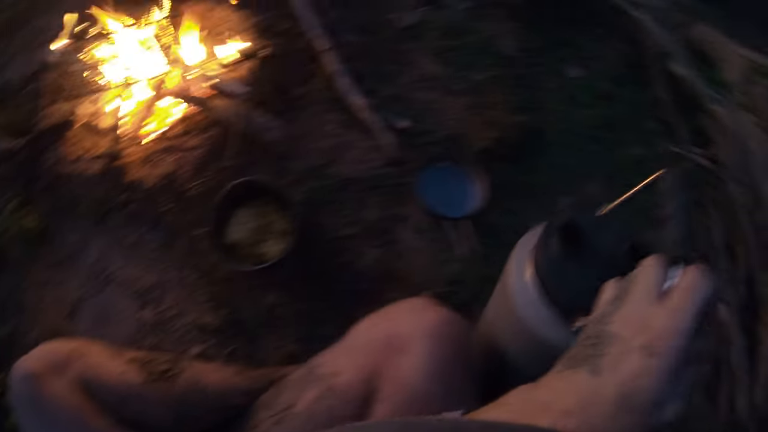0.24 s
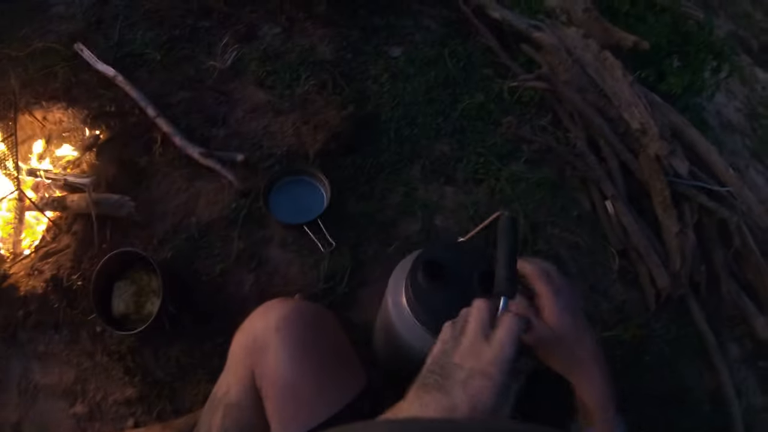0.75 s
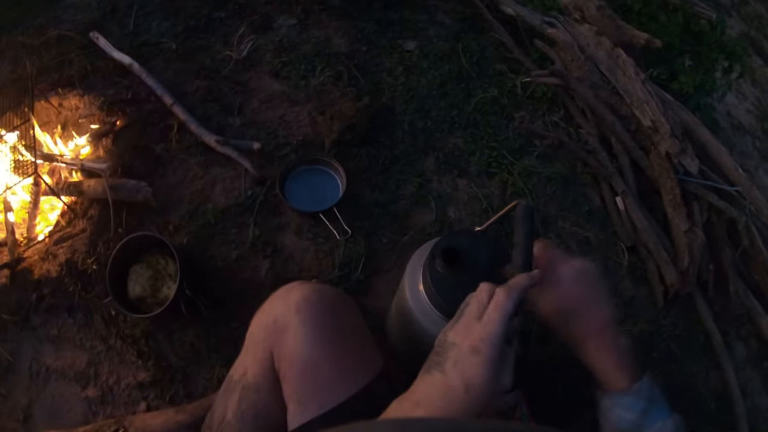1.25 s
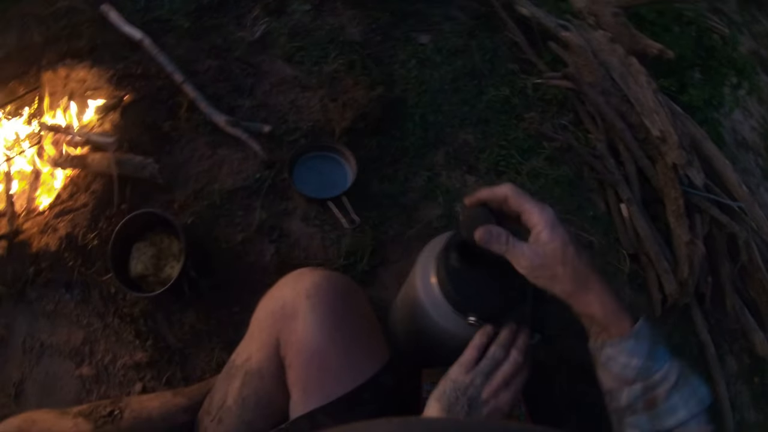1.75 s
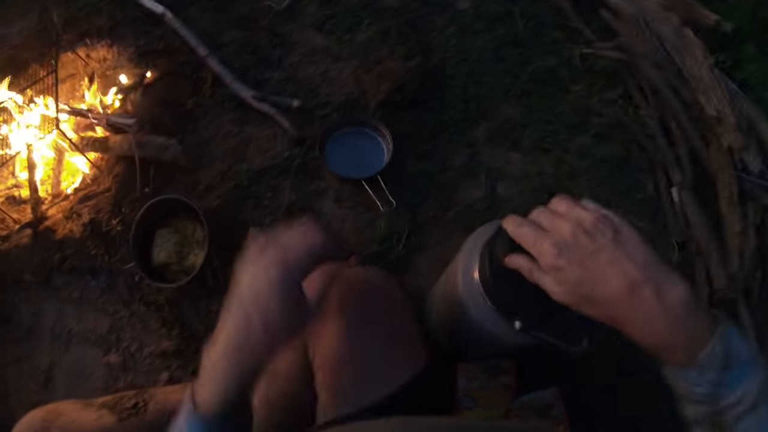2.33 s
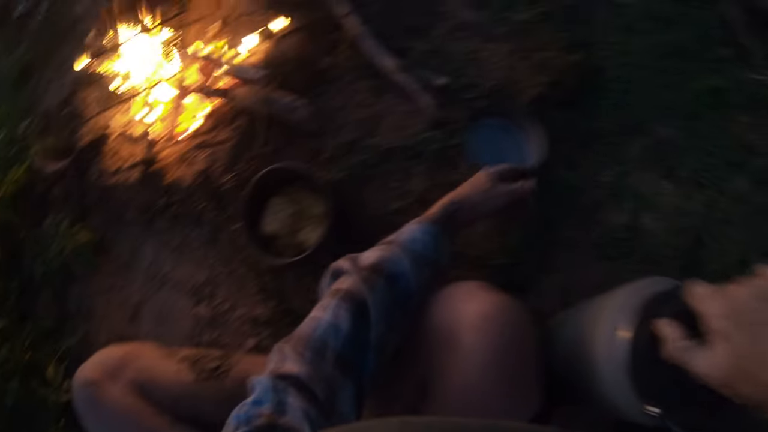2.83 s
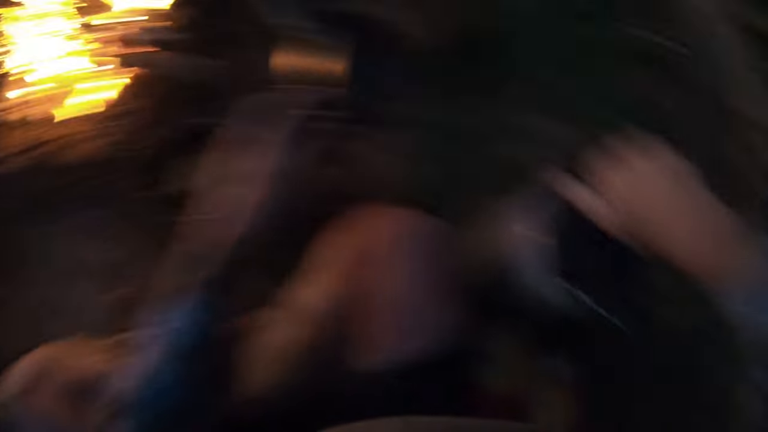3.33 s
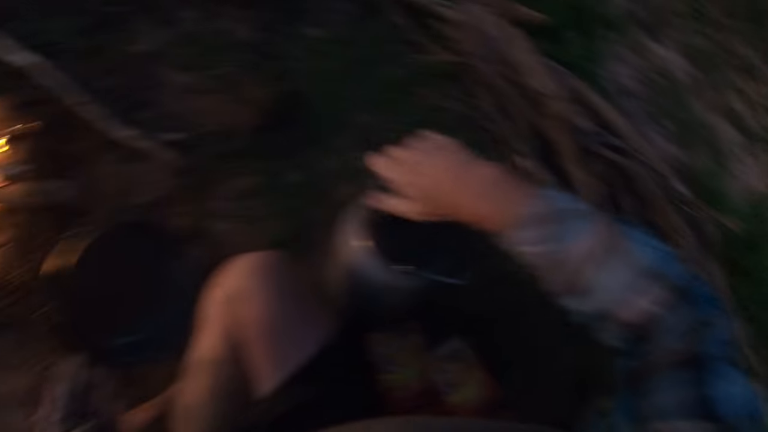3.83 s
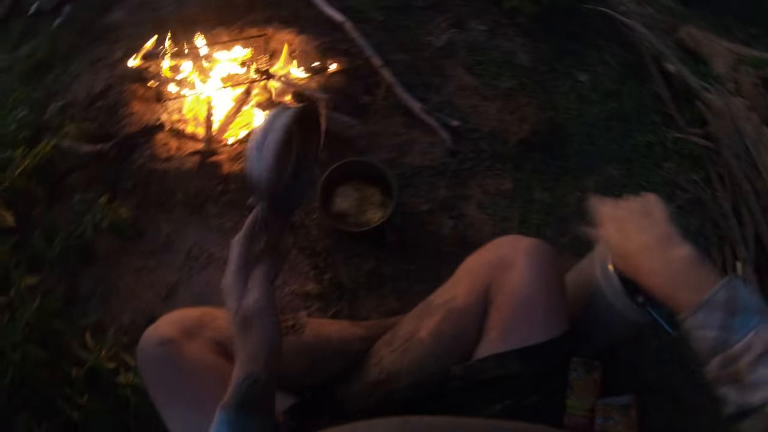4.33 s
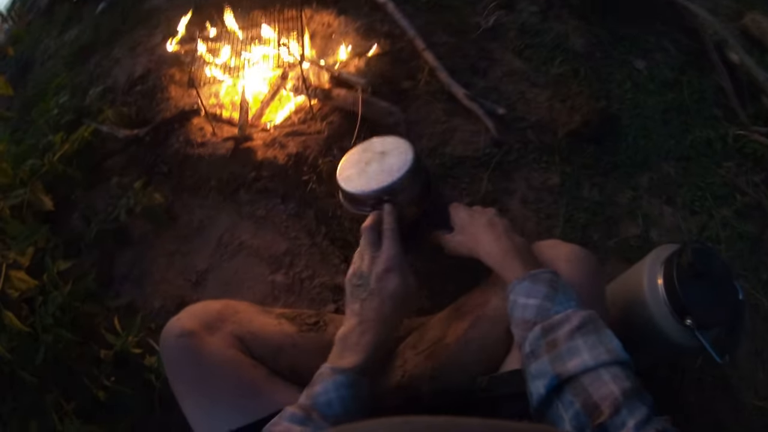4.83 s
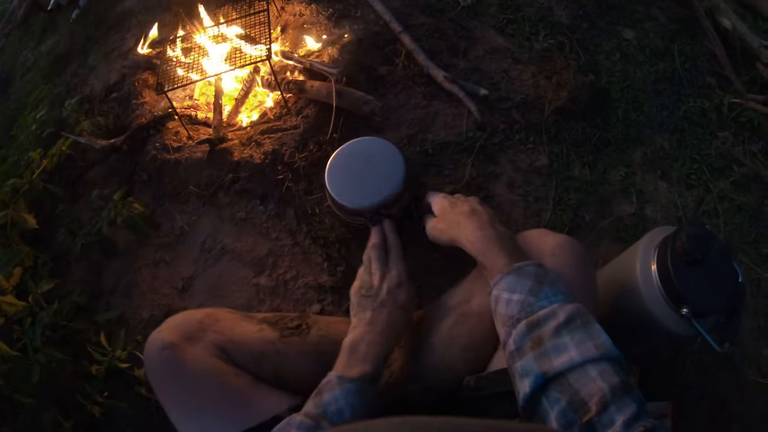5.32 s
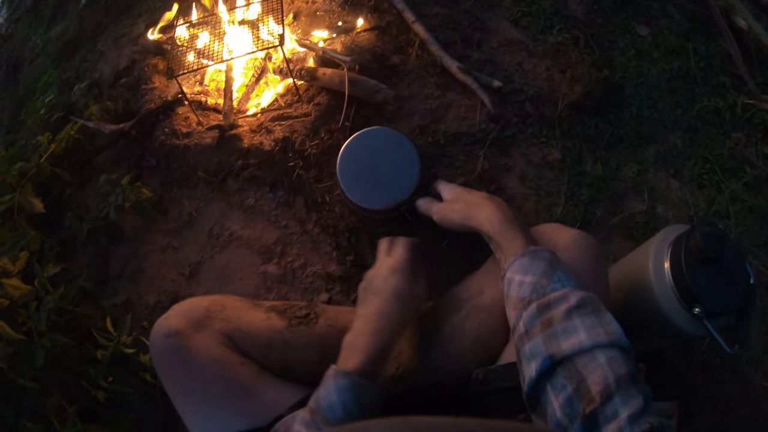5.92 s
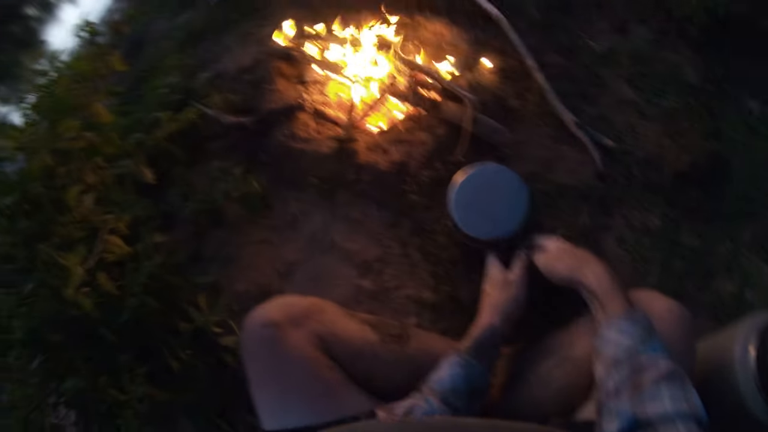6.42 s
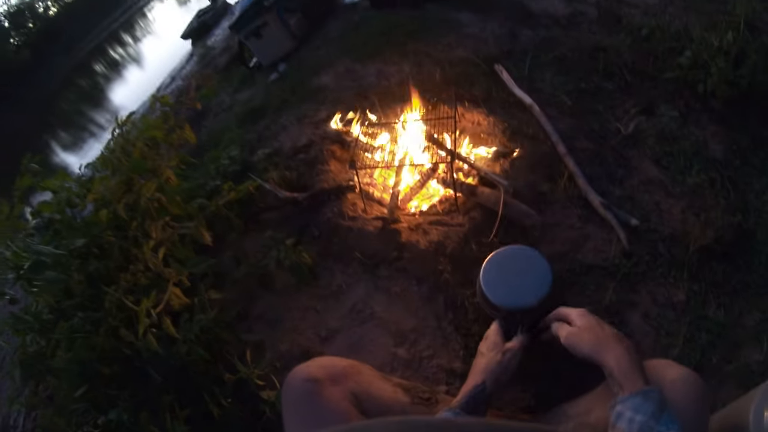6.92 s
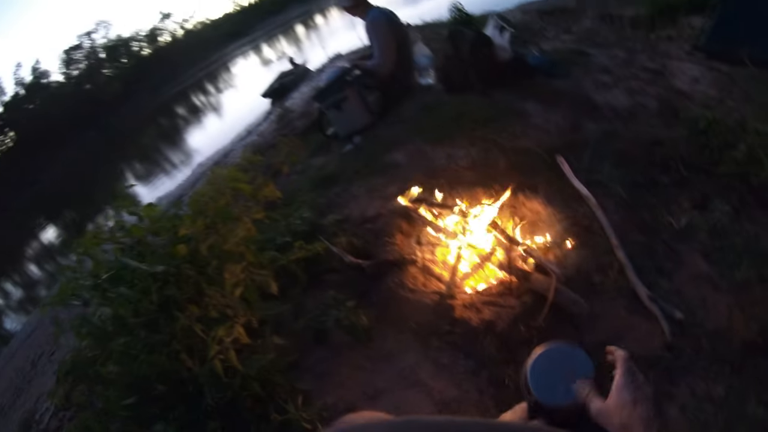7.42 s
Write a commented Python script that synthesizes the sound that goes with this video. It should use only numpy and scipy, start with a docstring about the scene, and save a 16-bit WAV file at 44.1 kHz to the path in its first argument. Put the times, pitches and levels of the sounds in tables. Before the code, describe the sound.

A quiet outdoor dusk bed of low fire roar, hiss and far insects runs throughout, with deep wind thumps on a chest-worn stereo microphone, strong near 0.2 s. A canister is scraped lightly from 0.3 s; a short, low liquid gulp glides upward at 0.6 s. Dry wire ticks follow at 0.8-1.2 s, tiny hinge chirps at 1.35-1.55 s, and dull knocks around 2.0-2.3 s. A thin pot scrapes from 2.8 s and clinks brightly at 3.03 s, its ring soon stilled; a very faint cricket trill passes at 3.4 s. Muffled bumps and brief scrapes come at 3.6-4.1 s. At 4.9 s a loud clank, then another at 5.2 s with a strong gritty scrape; a hollow tone sinks in pitch as pots slide together, ending in a rattle and knock at 5.8-5.9 s. Metallic clicks, knocks and short rasps continue to 7.5 s as wind flutter swells.

```python
"""Wind thumping two small microphone ports over hiss and low fire roar; then a scrape and a knock close by.
Place: beside a camp fire at dusk, the ports in a camera worn on the chest, far insects behind.
At hand distance a tall canister's lid and handle are worked, a gulp of liquid sounds, and a thin pot is
lifted, later capping another while its handles are folded. Noise bursts and scraping noise drive decaying
sines for the metal; wind and distance are shaped noise, the cricket a pulsed tone, the gulp a gliding tone."""
import sys
import numpy as np
from scipy import signal
from scipy.fft import rfft, irfft, next_fast_len
from scipy.io import wavfile
from scipy.ndimage import uniform_filter1d

SR = 44100
rng = np.random.default_rng(int(sys.argv[2]) if len(sys.argv) > 2 else 0)


def log_audio(samples):
    """Write samples as a 16-bit WAV file to the path given in sys.argv[1]."""
    # one column per channel
    frames = np.atleast_2d(samples).T
    # limit to full scale, then quantise
    limited = np.clip(frames, -1, 1)
    pcm = np.round(limited * 32767).astype(np.int16)
    wavfile.write(sys.argv[1], SR, pcm)


N = 337806
TIME_S = np.arange(N) / SR
OPPOSITE = np.array([[1], [-1]])  # signs at the left and right port


def undb(db):
    """Decibels to an amplitude factor."""
    return 10 ** (np.asarray(db) / 20)


def unit(x):
    """Scale to an RMS of one."""
    return x / np.sqrt(np.mean(x ** 2))


def curves(rows):
    """Columns of (time [s], ...) rows, interpolated to every sample."""
    s, *columns = np.transpose(rows)
    return [np.interp(TIME_S, s, column) for column in columns]


def colour(x, points):
    """Shape the spectrum by (frequency [Hz], gain [dB]) points on a log frequency axis."""
    hz, db = np.transpose(points)
    size = next_fast_len(N)
    bins_hz = np.maximum(np.arange(size // 2 + 1) * SR / size, 1)
    gain = undb(np.interp(np.log(bins_hz), np.log(hz), db))
    return irfft(rfft(x, size) * gain, size)[..., :N]


def band(x, hz, width):
    """Two-pole band-pass, width as a share of the centre."""
    b, a = signal.iirpeak(min(hz, .4 * SR), 1 / width, fs=SR)
    return signal.lfilter(b, a, x)


def twice_band(x, hz, width):
    """The same band-pass run twice, for steeper skirts."""
    return band(band(x, hz, width), hz, width)


def walk(rate):
    """Random levels held 1 / rate seconds and smoothed twice, RMS one."""
    hold = int(SR / rate)
    steps = np.repeat(rng.standard_normal(N // hold + 1), hold)
    smooth = uniform_filter1d(uniform_filter1d(steps, hold), hold)
    return unit(smooth[:N])


def add(track, s, piece):
    """Mix a piece in from time s."""
    i = int(s * SR)
    track[..., i:i + piece.shape[-1]] += piece[..., :N - i]


# spectrum of the distant bed before its level is set: (frequency [Hz], relative level [dB])
DUSK_SPECTRUM = [(110, -44), (145, 2.5), (190, 0.5), (400, -16.5), (550, -21), (740, -14.5), (2500, -24),
                 (7300, -12.5), (8500, -20), (9500, -41.5), (15000, -55)]


def distance():
    """The fire's low roar, hiss and a far insect band: shaped noise, unrelated at the two ports."""
    return unit(colour(rng.standard_normal((2, N)), DUSK_SPECTRUM)) * undb(-54)


# trilled phrases that swell in and fade: (middle [s], half length [s], level [dB])
CRICKET_PHRASES = [(3.426, 0.17, -67)]
CRICKET_HZ, CRICKET_PULSE_HZ = 5500, 72


def cricket():
    """One cricket: a high tone in fast pulses, its pitch rising through each pulse and wandering a little."""
    turn = 2 * np.pi * CRICKET_PULSE_HZ * TIME_S
    phase = 2 * np.pi * CRICKET_HZ * TIME_S - 1.5 * np.sin(turn) + 3 * walk(30)
    trill = (1 + np.sin(turn)) ** 2 * np.sin(phase)
    phrases = sum(undb(db) * np.exp(-((TIME_S - s) / half) ** 4) for s, half, db in CRICKET_PHRASES)
    return unit(trill) * phrases


# gusts before the eddies and port gains: (time [s], rumble level [dB], flutter level [dB])
WIND_GUSTS = [(0.04, -47, -79), (0.19, -34, -56.5), (0.49, -52, -76), (0.59, -42, -56), (0.83, -61, -79),
              (2.98, -50.5, -70), (3.11, -45.5, -53.5), (4.27, -53, -74), (4.46, -48.5, -46.5),
              (4.61, -43.5, -63), (5.29, -61, -80), (5.55, -45.5, -50), (5.99, -52, -54),
              (6.34, -41, -40.5), (7.66, -46.5, -35.5)]


def wind():
    """Eddies thump the ports: independent deep rumble and quicker flutter at each, under shared gusts."""
    rumble_db, flutter_db = curves(WIND_GUSTS)
    eddy_db = 3.5 * walk(8)
    rumble_spectrum = [(8, -13.0), (22, 11.5), (45, 3.5), (65, -8.5), (100, -62.0)]
    flutter_spectrum = [(40, -5.5), (70, 4.5), (120, -1.5), (250, -15.5), (500, -40.0), (1000, -99)]
    ports = []
    for port_db in (1.5, 4.0):
        rumble = unit(colour(rng.standard_normal(N), rumble_spectrum))
        flutter = unit(colour(rng.standard_normal(N), flutter_spectrum))
        gusts = undb(rumble_db + eddy_db) * rumble
        gusts = gusts + undb(flutter_db + eddy_db + 2 * walk(8)) * flutter
        ports.append(gusts * undb(port_db))
    return np.array(ports)


GULP_S, GULP_DB = .6, -30  # loudest moment, level of the lower tone
GULP_HZ, GULP_GLIDE_HZ_PER_S = 166.3, 790  # pitch at the loudest moment, upward glide
GULP_RISE_S, GULP_FALL_S = 0.028, 0.037


def gulp():
    """One low gulp of liquid in the canister: a ragged tone that glides up, with a rough overtone."""
    t = TIME_S - GULP_S
    phase = 2 * np.pi * (GULP_HZ * t + GULP_GLIDE_HZ_PER_S * t ** 2 / 2)
    phase = phase + 1.2 * walk(70)  # ragged
    swell = np.exp(-(t / np.where(t < 0, GULP_RISE_S, GULP_FALL_S)) ** 2)
    return swell * undb(GULP_DB) * (np.sin(phase) + undb(-4.0) * np.sin(1.726 * phase))


# the canister's wire handle in its hinge: (time [s], level [dB], pitch [Hz], t60 [s])
HINGE_CHIRPS = [(1.358, -40.5, 2260, 0.071), (1.36, -47, 1640, 0.23), (1.532, -43, 1875, 0.29)]


def chirps():
    """Short slipping tones whose pitch wanders."""
    out, t = np.zeros(N), np.arange(16384) / SR
    for s, db, hz, t60 in HINGE_CHIRPS:
        drift = np.cumsum(uniform_filter1d(rng.standard_normal(len(t)), size=300)) * 0.081
        fade = undb(db - 60 * t / t60) * np.minimum(t / 0.0005, 1)
        add(out, s, fade * np.sin(2 * np.pi * hz * t + drift))
    return out


# the pot is driven between the first two times and after the third: (time [s], time [s], time [s])
POT_DRIVEN_S = (2.75, 3.17, 4.87)


def pot_driven(t):
    """True while knocks and scrapes drive the pot rather than the canister."""
    lifted, canister_driven, pot_driven_again = POT_DRIVEN_S
    return ((t > lifted) & (t < canister_driven)) | (t > pot_driven_again)


def crack(db, hz, t60, width):
    """A fading burst of noise around one pitch, a little different at each port."""
    t = np.arange(4096) / SR
    fade = np.exp(-np.log(1000) * t / t60) * np.minimum(t / (0.013 * t60), 1)
    near, left, right = rng.standard_normal((3, len(t))) * fade
    burst = twice_band(near + .5 * np.array([left, right]), hz, width)
    onset_rms = np.sqrt(np.mean(burst[:, t < t60 / 6] ** 2))
    return undb(db - 8.5) * burst / onset_rms  # 8.5 dB from peak to onset RMS


# dull bumps of the vessels on hand, knee and ground, before port colouring: (time [s], nominal peak [dB])
DULL_BUMPS = [(2.336, -34.5), (2.544, -34), (2.822, -33), (3.577, -31), (3.636, -30), (3.73, -27),
              (4.922, -15), (5.883, -18.5)]


def bumps(air):
    """Low noise bursts that ring no metal."""
    for s, db in DULL_BUMPS:
        add(air, s, crack(db, 307, 0.087, 0.96))


# dry rattle of wire, latch and lid, before port colouring: (time [s], nominal peak [dB], centre [Hz])
RATTLE_TICKS = [(0.5412, -29.5, 5050), (0.5581, -26.5, 5500), (0.843, -24, 6250), (0.895, -28, 970),
                (0.915, -32.5, 1160), (0.9683, -29, 6100), (1.012, -30, 3420), (1.026, -30.5, 4170),
                (1.0815, -27, 5730), (1.2092, -34, 4040), (1.354, -31, 7300), (3.747, -29, 6000),
                (5.7318, -21.5, 6400), (5.809, -16, 7200), (6.2643, -29, 6350)]


def ticks(air, force):
    """Short narrow bursts, each with a one-sample push on the driven vessel."""
    for s, db, hz in RATTLE_TICKS:
        add(air, s, crack(db, hz, .045, .4))
        force[int(s * SR)] += undb(db - 24)


# sharp snaps of wire, before port colouring: (time [s], nominal peak [dB], centre [Hz])
WIRE_SNAPS = [(3.574, -37, 2450), (4.237, -34, 3770), (4.4786, -36, 2700), (4.708, -32, 3650),
              (4.8405, -21.5, 4000), (5.008, -23.5, 4070), (5.254, -28, 4500), (6.633, -25.5, 4970),
              (6.683, -31, 2550), (6.858, -31, 4530), (7.187, -20, 5800), (7.2379, -24.5, 4800),
              (7.4432, -27.5, 5630), (7.504, -32.5, 3380)]


def snaps(air, force):
    """Very short broad bursts that jolt the canister, but never the pot."""
    for s, db, hz in WIRE_SNAPS:
        add(air, s, crack(db, hz, 0.031, 1.15))
        force[int(s * SR)] += undb(db - 19.5) * ~pot_driven(np.array(s))


# knocks on the driven vessel, before port colouring: (time [s], nominal crack peak [dB], crack centre [Hz],
# push over crack [dB], push centre [Hz], push width [share of centre])
VESSEL_KNOCKS = [(0.368, -31.5, 1180, -5, 1280, 0.17), (2.015, -26.5, 1750, -7.5, 1040, 4.1),
                 (2.109, -26.5, 1460, 3.5, 504, 0.74), (2.893, -38.5, 6670, -1, 1880, 1.2),
                 (3.028, -15, 5850, 3.5, 1560, 0.25), (3.034, -24.5, 6500, 1, 3700, 1.36),
                 (3.134, -34, 7100, -1, 3970, 2), (3.186, -40.5, 1460, 6, 740, 1.9),
                 (4.919, -14.5, 3800, 6.5, 1410, 0.8), (5.2, -16.5, 4300, 3.5, 1570, 0.2),
                 (5.272, -22, 5460, -6.5, 2840, 1.1), (5.886, -17, 5846, -6, 3860, 0.49),
                 (6.186, -19.5, 5790, -11.5, 4150, 1), (6.293, -24.5, 4515, -15, 2250, .2),
                 (6.514, -27.5, 4850, -8, 2120, 0.29), (6.914, -20, 6030, 3, 2930, 0.29),
                 (6.916, -32.5, 1590, 8, 1600, 0.41)]


def knocks(air, force):
    """A crack, and a few milliseconds of bouncing push that favours the modes near its pitch."""
    t = np.arange(1024) / SR
    for s, db, hz, push_db, push_hz, width in VESSEL_KNOCKS:
        add(air, s, crack(db, hz, 0.087, 1.39))
        push = (t == 0) + .04 * rng.standard_normal(len(t)) * np.exp(-t / .002)
        add(force, s, undb(db + push_db) * twice_band(push, push_hz, width))


# pitch of the air shut in between the two pots as they slide together: (time [s], pitch [Hz])
HOLLOW_PITCH = [(5.2, 502), (5.4, 449.7), (5.65, 349.4), (5.85, 268.7), (6.5, 330)]
HOLLOW_WIDTH_HZ = 85.5


def hollow():
    """A narrow breath of noise on the pitch of the shut-in air, once the pots have met."""
    hz, = curves(HOLLOW_PITCH)
    waver = uniform_filter1d(rng.standard_normal((2, N)), int(SR / HOLLOW_WIDTH_HZ))
    carrier = np.exp(2j * np.pi * np.cumsum(hz) / SR)
    tone = np.real((waver[0] + 1j * waver[1]) * carrier)
    return unit(tone) * (TIME_S > HOLLOW_PITCH[0][0])


CONTACTS_PER_S, PATCH_WIDTH = 110, .08  # per patch of metal; share of its pitch


def chatter():
    """Tiny random contacts, each ringing its own patch of metal for a moment."""
    total = np.zeros(N)
    for hz in np.geomspace(1000, 7600, num=18):
        contacts = (rng.random(N) < CONTACTS_PER_S / SR) * undb(4.56 * rng.standard_normal(N))
        total += twice_band(contacts, hz, PATCH_WIDTH) / np.sqrt(hz)
    return unit(total)


# strokes of lid, handles and hands, before stroke shape and mix:
# (time [s], length [s], rasp level [dB], dull level [dB])
SCRAPE_STROKES = [(0.274, 0.25, -50.5, -58), (0.53, 0.15, -49.5, -46.5), (0.864, 0.14, -50, -50),
                  (0.984, 0.24, -50, -84), (1.488, 0.12, -49, -57), (1.993, 0.23, -68, -49),
                  (2.794, 0.64, -51, -59.5), (3.265, 0.18, -54.5, -53), (3.562, 0.16, -53.5, -52.5),
                  (3.699, 0.1, -46.5, -54), (4.069, 0.14, -47.5, -73), (5.013, 0.049, -49, -62),
                  (5.218, 0.17, -35.5, -53), (5.379, 0.3, -52, -60.5), (5.504, 0.13, -39, -62.5),
                  (5.593, 0.41, -45.5, -57.5), (5.786, 0.19, -43, -60.5), (6.258, 0.14, -44, -62),
                  (6.379, 0.091, -47, -66), (6.518, 0.085, -47, -60.5), (6.626, 0.19, -50, -76),
                  (6.88, 0.11, -44, -54), (7.073, 0.16, -45.5, -56), (7.253, 0.16, -51.5, -60)]
POT_RASP_HZ, CANISTER_RASP_HZ = 5000, 3130  # the thin pot rasps higher


def scrapes():
    """Dense uneven slips: a bright rasp, and a dull scrape through the held walls."""
    rasp, dull = np.zeros((2, N)), np.zeros(N)
    slips = undb(1.5 * rng.exponential(size=N) + 3 * walk(90))
    near, left, right, low = rng.standard_normal((4, N))
    grit = unit(slips * (near + 0.46 * np.array([left, right])))
    grit = grit + undb(-5) * chatter()
    low = unit(twice_band(low, 360, .8) * undb(3 * walk(30)))
    low = low + undb(6.5) * hollow()
    for s, length, rasp_db, dull_db in SCRAPE_STROKES:
        hz = POT_RASP_HZ if pot_driven(s) else CANISTER_RASP_HZ
        i, u = int(s * SR), np.linspace(0, 1, int(length * SR))
        stroke = np.minimum(u / .14, 1) * np.minimum((1 - u) / .6, 1) ** 1.2  # bites fast, lets go slowly
        bright = unit(twice_band(grit[:, i:i + len(u)], hz, 2.64))
        add(rasp, s, undb(rasp_db) * stroke * bright)
        add(dull, s, undb(dull_db) * stroke * low[i:i + len(u)])
    return rasp, dull


def ring(force, modes, spread, wander_db=0.):
    """Each mode answers the force with a fading sine; a wandering contact wakes now one mode, now another.
    Neighbouring modes reach the ports in opposite order, their phases turned by spread [radians]."""
    out, busy = np.zeros((2, N)), np.flatnonzero(force)
    span = slice(busy[0], busy[-1] + SR)
    for k, (hz, db, t60) in enumerate(modes):
        pole = np.exp((2j * np.pi * hz - np.log(1000) / t60) / SR)
        drive = force * undb(wander_db * walk(25)) if wander_db else force
        z = signal.lfilter([undb(db)], [1, -pole], drive[span] + 1e-18)
        out[:, span] += np.cos(spread) * z.imag + (-1) ** k * np.sin(spread) * z.real * OPPOSITE
    return out


RUBBED_RING = 0.35  # share of the ring time left while the metal is rubbed
# modes of the canister, t60 as struck: (pitch [Hz], level [dB], t60 [s])
CANISTER_MODES = [(452.5, 2, 0.078), (724.5, -5.5, 0.26), (1067, -15, 0.8), (1840, -26.5, 0.38),
                  (2114, -12.5, 0.43), (2710, -25, .1), (3160, -16, 0.2), (3980, -2.5, 0.087),
                  (6230, -5, 0.13)]


def canister(force, rasp, dull):
    """The canister rings when struck, and more briefly when rubbed, while the pot is not the one driven."""
    driven = ~pot_driven(TIME_S)
    struck = ring(force * driven, CANISTER_MODES, 0.76)
    rub = (undb(-24) * rasp + undb(-46.5) * dull) * driven
    return struck + ring(rub, np.array(CANISTER_MODES) * [1, 1, RUBBED_RING], 1.0, 7.5)


# pitches of the pot's modes: (pitch [Hz])
POT_PITCHES = [300, 491, 767, 1082, 1130, 1633, 2191, 2263, 2975, 3703, 3835, 4768, 5587, 5701, 5845, 6318,
               6730, 6968, 7320]
# the same modes, t60 before the share of a spell or rub: (level [dB], t60 [s])
POT_LEVELS = [(11.5, 0.039), (5, 0.15), (-9.5, 0.43), (-1.5, 0.11), (-27, 1), (-10.5, 0.2), (-8.5, 0.35),
              (-11.5, 0.27), (-10, 0.27), (-15, 0.24), (-1, 0.094), (-6, 0.13), (-12.5, 0.31), (-17, 0.38),
              (-22, 0.11), (-7.5, 0.051), (-6.5, 0.092), (-12.5, 0.33), (-2, 0.12)]
# a low mode of the hanging pot, near 500 Hz: (pitch [Hz], relative level [dB], t60 [s])
POT_HUM_MODE = [(497.3, 0, 0.41)]
# spells of handling: (struck from [s], until [s], ring time [share of t60], hand stills it from [s])
POT_SPELLS = [(2.75, 3.17, 0.96, 3.42), (4.87, 5.19, 1.18, 5.27), (5.19, 8, 0.81, 8)]
POT_HANGS_UNTIL_S, STILLED_S = 3.8, .03  # STILLED_S: time constant of the stilling hand


def pot(force, rasp, dull):
    """The thin pot hums as it hangs, rings when struck until a hand stills it, and rings briefly if rubbed."""
    modes = np.column_stack([POT_PITCHES, POT_LEVELS])
    hangs = (TIME_S > POT_DRIVEN_S[0]) & (TIME_S < POT_HANGS_UNTIL_S)  # from its handle
    metal = ring(undb(-42.5) * dull * hangs, POT_HUM_MODE, 0.67)
    for start, end, share, stilled in POT_SPELLS:
        blows = force * (TIME_S > start) * (TIME_S < end)
        struck = ring(blows, modes * [1, 1, share], 0.22)
        metal = metal + struck * np.exp(-np.maximum(TIME_S - stilled, 0) / STILLED_S)
    rub = (undb(-25.5) * rasp + undb(-45) * dull) * pot_driven(TIME_S)
    return metal + ring(rub, modes * [1, 1, RUBBED_RING], 0.41, 4.4)


# colour of the microphone ports on the handling sounds: (frequency [Hz], gain [dB])
PORT_COLOUR = [(3000, -5.5), (5200, -8), (7000, 0), (8000, -12), (9000, -20.5), (14000, -21.5),
               (16000, -23)]


def through_ports(close):
    """Colour both ports alike, then set them further apart, most of all in the treble."""
    left, right = colour(close, PORT_COLOUR)
    apart = colour(left - right, [(4000, 0.2), (8000, 7.1)])
    return (left + right + apart * OPPOSITE) / 2


# balance of the hands before the chest: (time [s], left minus right [dB])
HANDS_BALANCE = [(0, -5), (3, -1.5), (4.9, 0.5)]


def cookware():
    """Knocks and scrapes at hand distance, with the ring of whichever vessel they drive."""
    air, force = np.zeros((2, N)), np.zeros(N)
    bumps(air)
    ticks(air, force)
    snaps(air, force)
    knocks(air, force)
    rasp, dull = scrapes()
    rasp_mid = rasp.mean(axis=0)
    metal = canister(force, rasp_mid, dull) + pot(force, rasp_mid, dull)
    close = air + undb(3) * rasp + metal  # the rasp heard directly, raised 3 dB
    hands = through_ports(close) + dull + chirps()
    pan_db, = curves(HANDS_BALANCE)
    return hands * undb(np.array([pan_db, -pan_db]) / 2)


def scene():
    """Background to foreground: distance, cricket, wind, the gulp, the cookware."""
    return distance() + cricket() + wind() + gulp() + cookware()


def record(dry):
    """The camera cuts the top: a steep low-pass at 15900 Hz."""
    return signal.sosfilt(signal.ellip(8, .2, 70, 15900, fs=SR, output="sos"), dry)


dry = scene()
out = record(dry)
log_audio(out)
```